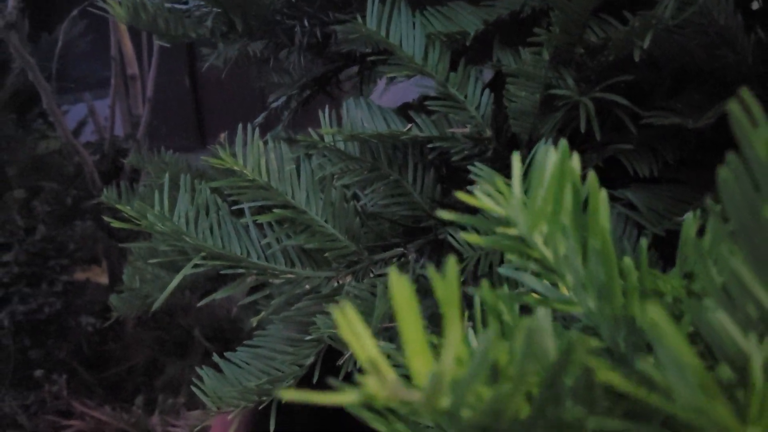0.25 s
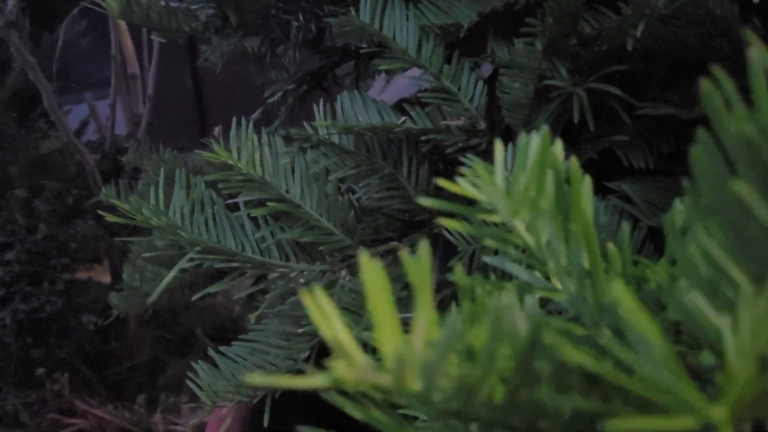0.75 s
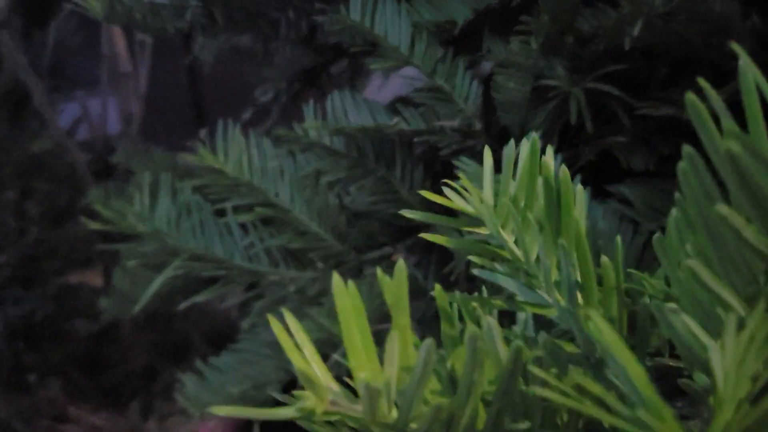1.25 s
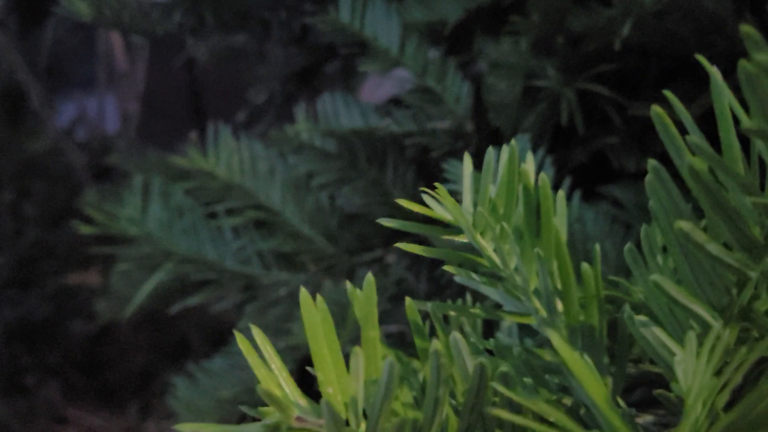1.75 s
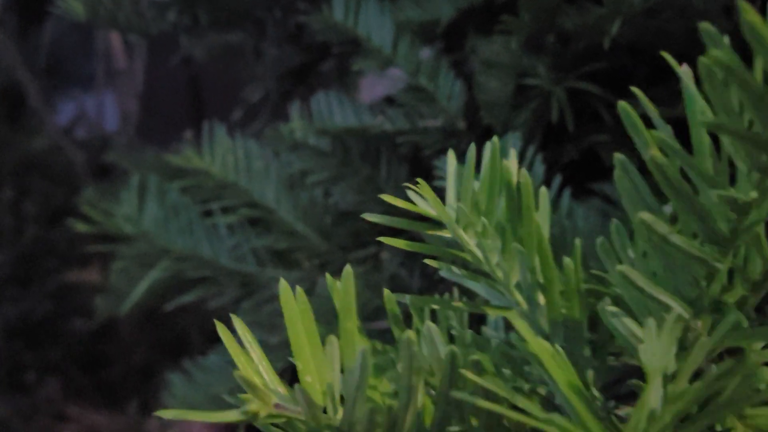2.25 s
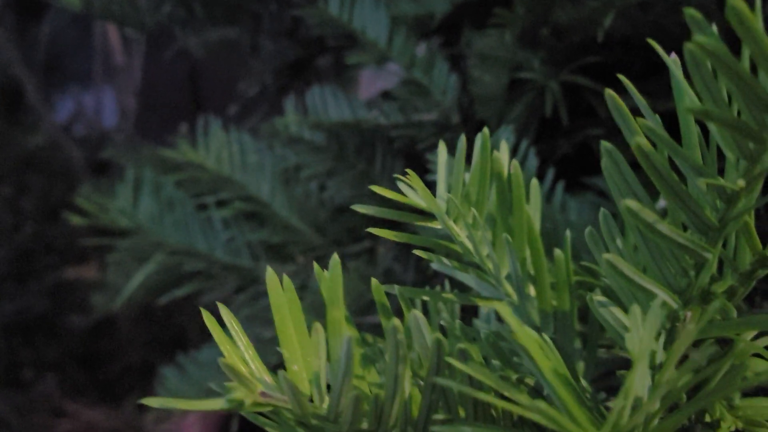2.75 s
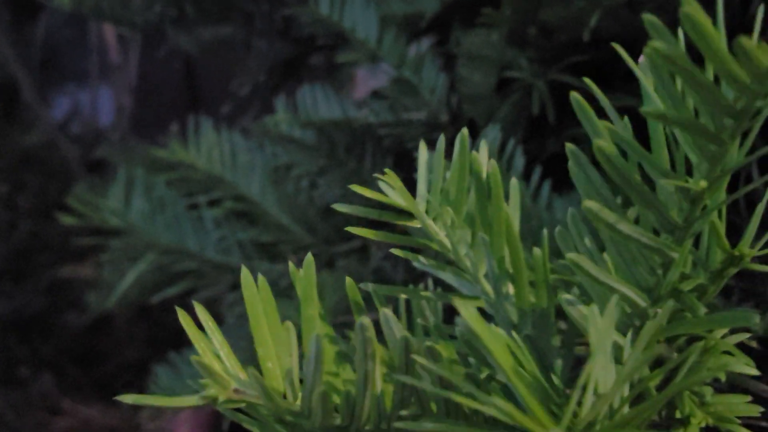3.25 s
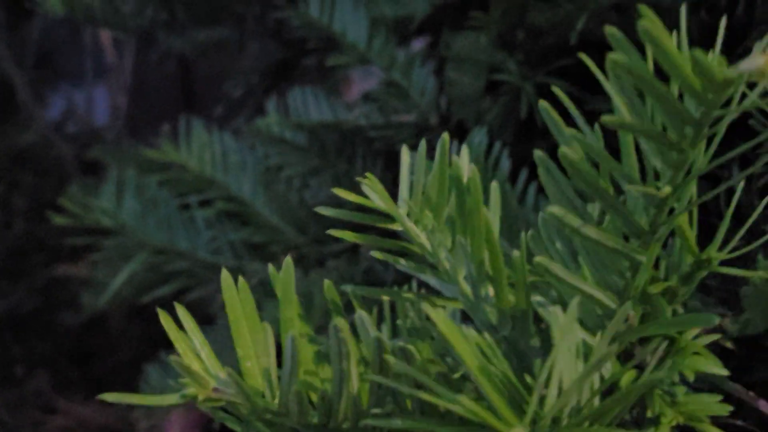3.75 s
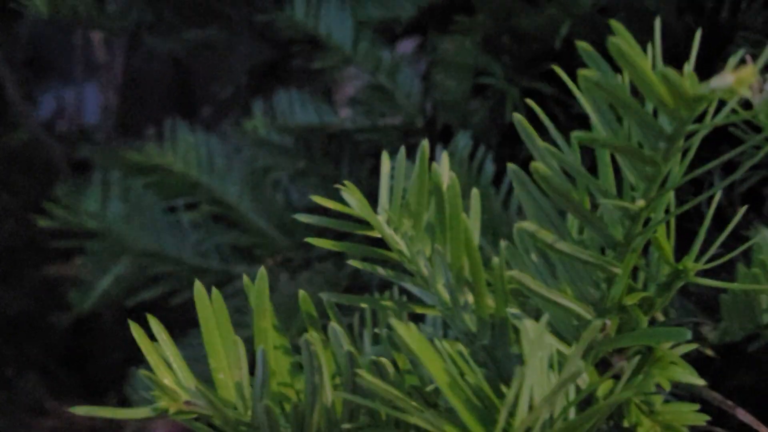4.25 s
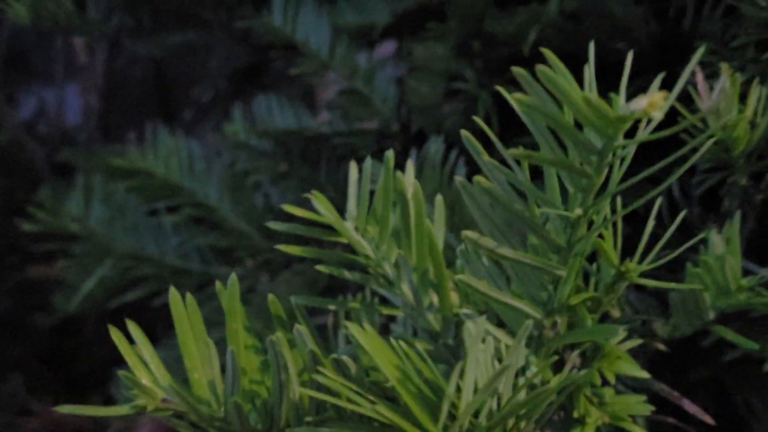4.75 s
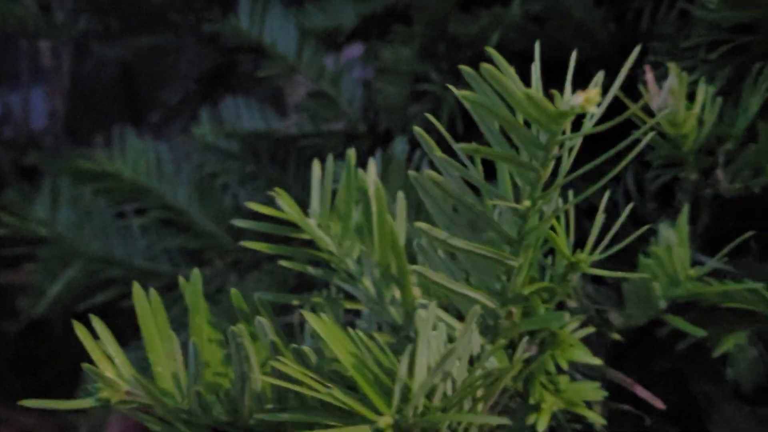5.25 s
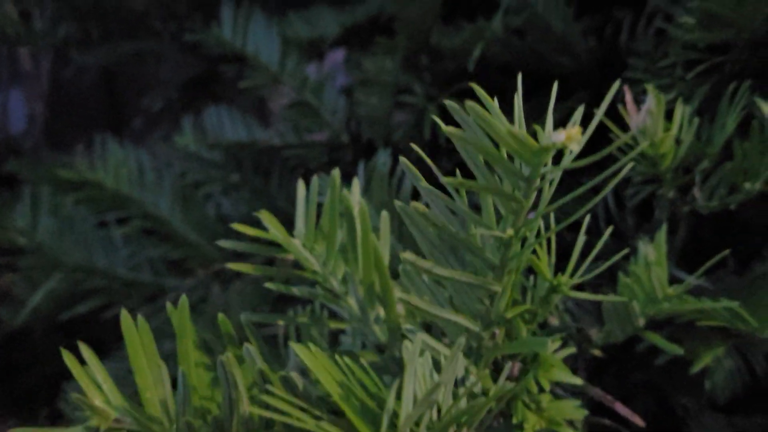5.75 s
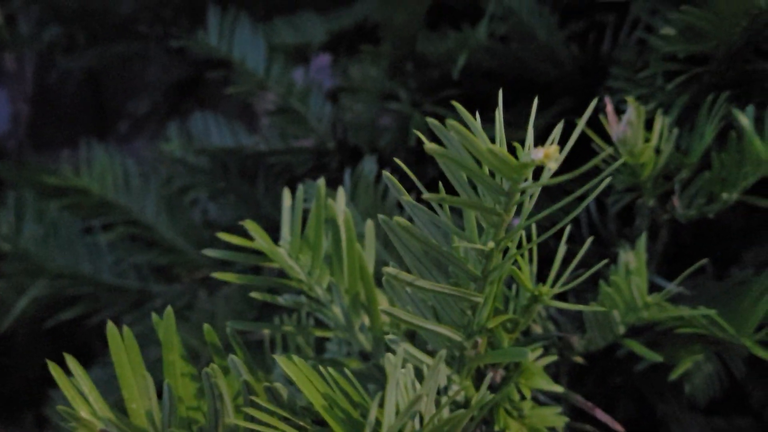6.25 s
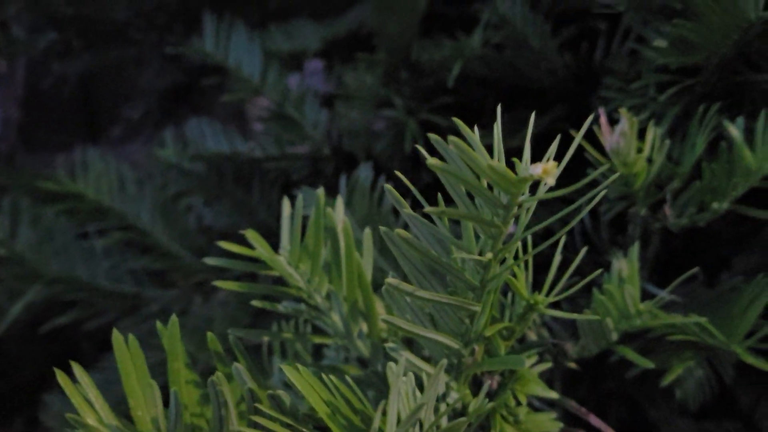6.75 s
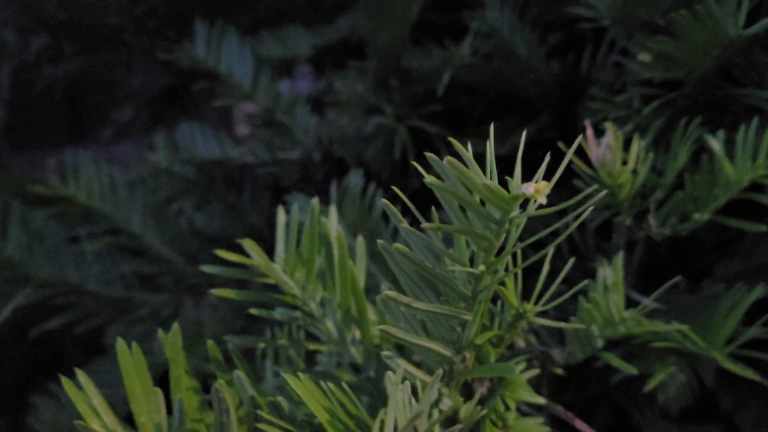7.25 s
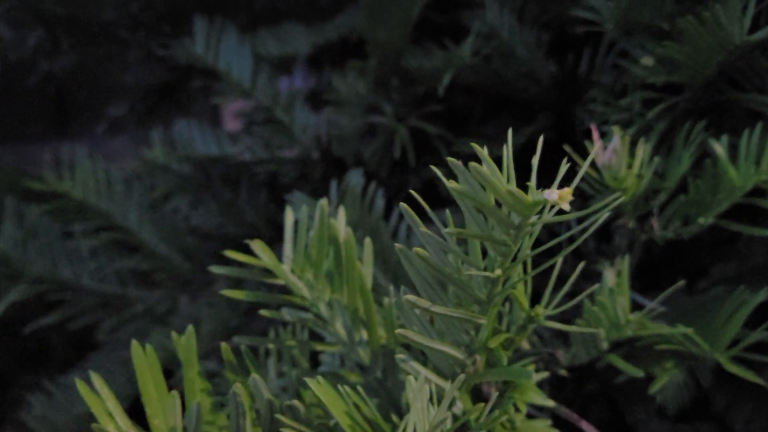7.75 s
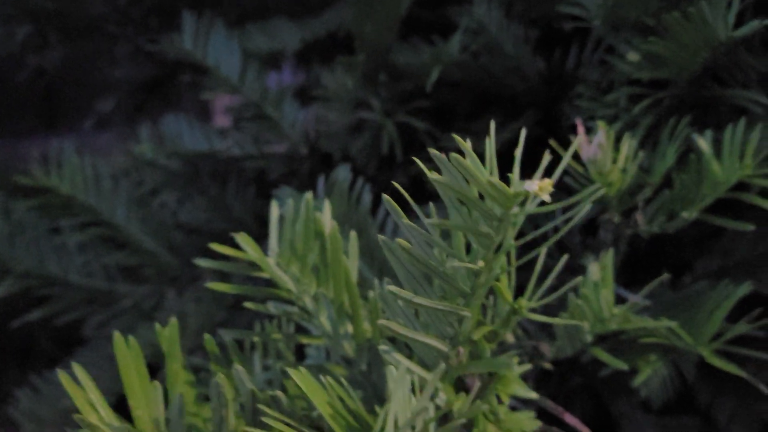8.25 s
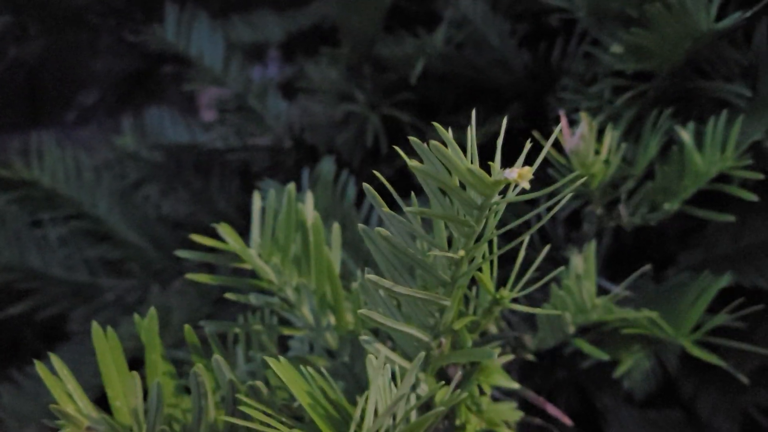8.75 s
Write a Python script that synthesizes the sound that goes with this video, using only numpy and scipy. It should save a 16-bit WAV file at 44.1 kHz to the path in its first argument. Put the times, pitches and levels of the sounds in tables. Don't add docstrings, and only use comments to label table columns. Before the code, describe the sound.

A tree frog close on the right gives short, high, rattling trills about four a second, over faint low town rumble and soft air hiss.

```python
import sys
import numpy as np
from scipy import signal
from scipy.fft import rfft, irfft
from scipy.io import wavfile
from scipy.ndimage import uniform_filter1d, minimum_filter1d

SR = 44100
rng = np.random.default_rng(int(sys.argv[2]) if len(sys.argv) > 2 else 0)


def transcribe(signal):
    frames = np.atleast_2d(signal).T
    limited = np.clip(frames, -1, 1)
    pcm = np.round(limited * 32767).astype(np.int16)
    wavfile.write(sys.argv[1], SR, pcm)


def makeup_ratio(level_db):
    decades = np.asarray(level_db, float) / 20
    return 10 ** decades


N = 396900
FREQ = np.maximum(np.arange(N // 2 + 1) * SR / N, 1)


def on_log(table, hz):
    points_hz, values = np.transpose(table)
    return np.interp(np.log(hz), np.log(points_hz), values)


def curve(table, column):
    rows = np.array(table)
    return np.interp(np.arange(N) / SR, rows[:, 0], rows[:, column])


def smooth_twice(x, size):
    return uniform_filter1d(uniform_filter1d(x, size), size)


def walk(rate_hz):
    hold = int(SR / rate_hz)
    levels = rng.standard_normal(N // hold + 1)
    return 1.3 * smooth_twice(np.repeat(levels, hold), hold)[:N]


# (frequency [Hz], correlation [-1 to 1])
LIKENESS = [(30, .72), (60, .85), (120, .82), (300, .85), (1000, .6), (4000, .3)]


def noise(gain):
    mid, side = rfft(rng.standard_normal((2, N))) * gain
    alike = np.clip(on_log(LIKENESS, FREQ), -1, 1)
    mid = mid * np.sqrt(1 + alike)
    side = side * np.sqrt(1 - alike)
    out = irfft(np.array([mid + side, mid - side]), N)
    return out / out.std()


# (time [s], half length [s], bass rise [dB], drone rise [dB])
SURGES = [
    (0, 0.79, 6.5, 0),
    (2.4, 0.26, 1, 4.5),
    (3.549, .25, 0.5, -0.5),
    (3.898, .25, 0, 4),
    (4.62, 0.17, 8.5, -2),
    (4.935, 0.23, 2, 8),
    (5.88, .3, 1, 4),
    (8.9, 0.13, 4, -0.5),
]


def surge(column):
    t = np.arange(N) / SR
    return sum(row[column] * np.exp(-((t - row[0]) / row[1]) ** 2) for row in SURGES)


# (frequency [Hz], density [dB per Hz])
RUMBLE = [(12, -30), (20, -12), (43, -4), (64, 0.5), (83, -0.5), (134, -7.5), (219, -24), (322, -13.5),
          (383, -21.5), (480, -36), (620, -68.5), (1060, -120)]
# (frequency [Hz], density [dB per Hz])
DUSK_AIR = [(360, -41), (620, -9), (714, -16.5), (802, -10.5), (1080, -13.5), (1300, -9.5), (1880, -13.5),
            (2890, -8), (3710, -14), (4530, -23), (5890, -53.5), (9970, -120)]
# (frequency [Hz], width [Hz], level [dB])
HUM = [(61.7, 17, -59), (296, 20, -77.5)]
BASS_DB, DRONE_DB, DUSK_AIR_DB, HISS_DB = -58, -66, -79 + 1.0, -89


def background():
    low = makeup_ratio(on_log(RUMBLE, FREQ))
    bass_share = 1 / (1 + (FREQ / 175) ** 8)
    bass = noise(low * bass_share) * makeup_ratio(BASS_DB - 4.5 + surge(column=2) + 1.0 * walk(4))
    drone = noise(low * (1 - bass_share)) * makeup_ratio(DRONE_DB + 1.0 + surge(column=3) + 0.75 * walk(7.8))
    hum = sum(makeup_ratio(db) * noise(1 / (1 + (2 * (FREQ - hz) / width_hz) ** 2)) for hz, width_hz, db in HUM)
    air = noise(makeup_ratio(on_log(DUSK_AIR, FREQ))) * makeup_ratio(DUSK_AIR_DB + 1.0 * walk(4))
    left, right = bass + drone + hum + air
    hiss = makeup_ratio(HISS_DB) * rng.standard_normal((2, N))
    return np.array([np.roll(left, shift=-22) * makeup_ratio(0.8), right * makeup_ratio(1.8)]) + hiss


# (delay [ms], left level [dB], right level [dB])
ECHOES = [
    (3.9, -14, -15.5),
    (7.7, -24, -24),
    (13, -27, -27),
    (22, -29, -29),
    (39, -35, -32),
]
# (frequency [Hz], quick level [dB], quick t60 [s], slow level [dB], slow t60 [s])
GARDEN = [(770, -20.5, 0.21, -49, 1), (1500, -11, 0.075, -37, 0.34), (2520, -27.5, 0.26, -41, 0.47),
          (3020, -22, 0.16, -36.5, 0.39), (3520, -37, 0.44, -47, 0.55), (5000, -10, 0.12, -35, 0.26),
          (9000, -27, 0.091, -42.5, .25)]


def garden():
    t = np.arange(SR // 2) / SR
    hz = np.maximum(np.arange(len(t) // 2 + 1) * SR / len(t), 1)
    patchy = makeup_ratio(28 * uniform_filter1d(rng.standard_normal((2, len(t))), size=64))
    onset = 1 - np.exp(-(t / .005) ** 2)
    leaves = rng.standard_normal((2, len(t))) * patchy * onset / 21
    out = np.zeros((2, len(t)))
    centres_hz = [row[0] for row in GARDEN]
    for k, (_, db, t60_s, slow_db, slow_t60_s) in enumerate(GARDEN):
        this_band = np.arange(len(centres_hz)) == k
        share = on_log(list(zip(centres_hz, this_band)), hz)
        fade = makeup_ratio(db - 60 * t / t60_s) + makeup_ratio(slow_db - 60 * t / slow_t60_s)
        out += irfft(rfft(leaves * fade) * share, len(t))
    out[:, 0] += 1
    for delay_ms, *db in ECHOES:
        out[:, int(delay_ms * SR / 1000)] += makeup_ratio(np.array(db))
    return out


# (frequency [Hz], density [dB per Hz])
RASP = [(1000, -43.5), (2200, -1), (4000, 0.5), (4800, -14.5), (5850, -12.5), (7000, -21.5), (8300, -10.5),
        (9500, -22), (10100, -38.5), (11600, -45.5), (15500, -52)]
RASP_DB = -22


def rasp(voice):
    air = irfft(rfft(rng.standard_normal(N)) * makeup_ratio(on_log(RASP, FREQ)), N)
    flow = smooth_twice(np.abs(voice), 130)
    flow = np.abs(flow) ** 1.114 * makeup_ratio(3.5)
    return makeup_ratio(RASP_DB) * flow * np.array([np.roll(air, shift=18), air]) / air.std()


GAP_MS, GAP_EXTRA_MS, GAP_SETTLE_PULSES, GAP_SHRINK_MS = 5.7, 1.35, 2.6, .055
WARMUP_1_MS, WARMUP_2_MS, WARMUP_MS_PER_DB = 10.0, 8.2, .07


def larynx_pulses(length_ms, count, warm_db, last_db, chance):
    k = np.arange(count - 1)
    gaps_ms = GAP_MS + GAP_EXTRA_MS * np.exp(-k / GAP_SETTLE_PULSES) - GAP_SHRINK_MS * k
    run_ms = np.cumsum(gaps_ms) - gaps_ms
    run_ms = run_ms * (length_ms - 5.2 - .12 * last_db) / run_ms[-1]
    warm_ms = WARMUP_2_MS + WARMUP_MS_PER_DB * (warm_db + 10)
    ms = np.r_[-WARMUP_1_MS - warm_ms, -warm_ms, run_ms, length_ms, length_ms + 4.1]
    ms[3:-2] += .015 * chance[3:count + 1, 0]
    attack_db = (-6.5 + .2 * (warm_db + 14)) * np.exp(-k / 1.7)
    tail_db = -2.5 * np.exp((k - k[-1]) / 1.5)
    db = np.r_[warm_db - 21, warm_db - 1.1, attack_db + tail_db, last_db, 2.2 * last_db - 3.5]
    fill = 1 - np.exp(-np.maximum(ms + 2.0, 0) / 36)
    return ms, db + .4 * chance[:count + 3, 1], fill


# (early pitch [Hz], late pitch [Hz], early level [dB], late level [dB], left extra [dB])
RINGS = [(800, 810, -30.5, -27.5, 3.5), (1217, 1393, -8.5, -15.5, 4.5), (1444, 1702, -20, -16.5, 4.5),
         (2100, 770, -25.5, -50, -3), (2120, 2496, -28.5, -18, -5.5), (2789, 3126, 0.5, -1, -1),
         (2794, 2960, -20.5, -13.5, 0), (3570, 3500, -22, -23, -4), (3800, 4834, -35, -26, 2),
         (4920, 4836, -46, -28.5, 2.5), (6050, 6250, -42.5, -46.5, -5), (8020, 8520, -40, -31, -2.5),
         (10700, 10550, -58, -47.5, -13.5), (12200, 18000, -67, -62, -3.5)]
STAGES = [3, 3, 3, 3, 3, 8, 3, 3, 3, 3, 3, 3, 3, 3]
TAU_MS = [1.0, .62, .5, .6, .6, .31, .9, .5, .4, .55, .6, .33, .6, .6]
PEAK_MS = [-.2, -.7, -.95, -.8, -.3, -.05, 1.5, 0, -.2, -.2, -.6, .3, .3, .3]
LEFT_MS = [0.022, 0.012, 0.00094, .016, -0.025, -0.0021, -0.031, -0.029, .001, 0.0049, -0.017, -0.035,
           -0.021, .001]
TURN = [.7, .7, .7, .7, .9, 1, 1, 1, 1, 1, 1, 1, 1, 1]
SAG_PER_MS2, BASS_SAG_RATIO = 0.0026, 6.4
WARMUP_RING = 0.89
LEFT_FILL_DB = 1


def sac_rings(late_samples, warming, db, fill, lag_ms, pan_db, luck):
    hz0, hz1, db0, db1, left_db = np.array(RINGS).T[:, :, None]
    stages, tau_ms, peak_ms, left_ms, turn = np.array([STAGES, TAU_MS, PEAK_MS, LEFT_MS, TURN])[:, :, None]
    low_ring = turn < .8
    turned_ms = lag_ms - .41
    hz = (hz0 + (hz1 - hz0) * fill) * (1 + .003 * luck[2])
    ring_db = db0 + (db1 - db0) * fill + 1.0 * luck[3:, None] * (db0 < -5)
    ring_db = ring_db + np.minimum(-.35 * db, 5) * low_ring
    ring_db = ring_db + .7 * min(db + 5.5, 0) * (hz0 > 7000)
    ring_db = ring_db - 35 * turned_ms * (hz0 > 5000)
    ring_db = ring_db + 15 * turned_ms * (hz0 < 2000)
    tau = tau_ms * (WARMUP_RING if warming else 1)
    ears_ms = (.41 + turn * turned_ms + left_ms, 0)
    turn_db = -4.4 + (pan_db + 4.4) * np.where(low_ring, -1.3, 1) + left_db
    ears_db = (turn_db + LEFT_FILL_DB * (fill - .6) * (np.abs(hz0 - 2800) < 300), 0)
    sag = SAG_PER_MS2 * np.where(low_ring, BASS_SAG_RATIO, 1)
    out = np.zeros((2, 640))
    for ear in range(2):
        after_peak_ms = (np.arange(640) - late_samples) * 1000 / SR - 4 - ears_ms[ear] - peak_ms
        t_ms = np.maximum(after_peak_ms + stages * tau, 0)
        body = np.exp(stages * np.log(t_ms / tau / stages + 1e-9) + stages - t_ms / tau)
        cycles = hz * (t_ms - sag * np.clip(after_peak_ms + .3, 0, 3) ** 3 / 3) / 1000
        rings = makeup_ratio(ring_db + ears_db[ear]) * body * np.sin(2 * np.pi * cycles)
        out[ear] = rings.sum(axis=0)
    return out


# (time [s], left ear lag [ms], left minus right at the main ring [dB])
AIM = [
    (0, .468, -5.0),
    (2.4, .459, -4.9),
    (3.7, .446, -5.0),
    (5.3, .407, -5.0),
    (7.3, .363, -3.3),
    (9, .345, -3.4),
]
# (first full pulse [s], time to last pulse [ms], warm-up pulse [dB])
FIRST_BOUT = [(.0646, 74.3, -22.7), (.2782, 78.0, -23.1), (.4927, 71.8, -22.1), (.7057, 74.0, -20.0),
              (.9763, 74.1, -14.6), (1.2317, 74.4, -12.6), (1.4505, 74.9, -14.5), (1.7014, 78.2, -9.5),
              (1.922, 75.6, -12.7), (2.1598, 78.0, -12.1), (2.4035, 77.7, -9.1), (2.6122, 72.6, -6.5),
              (2.8195, 79.0, -18.3), (3.03, 77.7, -18.1), (3.2593, 75.5, -9.3), (3.4958, 77.0, -13.1),
              (3.7071, 74.6, -17.0), (3.916, 78.5, -18.1), (4.19, 78.0, -10.9), (4.4613, 79.1, -10.2)]
# (first full pulse [s], time to last pulse [ms], warm-up pulse [dB])
SECOND_BOUT = [(4.8468, 77.3, -6.5), (5.0577, 74.4, -5.5), (5.2628, 73.9, -17.9), (5.4736, 75.3, -16.4),
               (5.6848, 74.8, -18.2), (5.9089, 74.9, -11.7), (6.1479, 74.7, -11.2), (6.3888, 74.3, -11.3),
               (6.5956, 74.8, -17.6), (6.8082, 74.5, -19.2), (7.0341, 74.8, -12.6), (7.2449, 74.2, -16.8),
               (7.4885, 78.5, -12.1), (7.7022, 75.4, -16.4), (7.9569, 79.2, -11.4), (8.1635, 75.6, -19.7),
               (8.4328, 79.4, -11.4)]
USUAL_PULSES, USUAL_MS, MS_PER_EXTRA_PULSE = 14, 74.3, 4.2
EASY_PACE_MS, LAST_DB, HURRY_DB_PER_MS = 5.39, -3.5, 24
FROG_DB, PEAK_DB, TIRES_S, TIRE_DB_PER_S = 3.63, 0.34, 6.7, 0.48


def frog():
    out = np.zeros((2, N + 1024))
    lag_ms, pan_db = curve(AIM, column=1), curve(AIM, column=2)
    notes = FIRST_BOUT + SECOND_BOUT
    chance = rng.standard_normal((len(notes), 20, 3 + len(RINGS)))
    for (s, length_ms, warm_db), luck in zip(notes, chance):
        count = round(USUAL_PULSES + (length_ms - USUAL_MS) / MS_PER_EXTRA_PULSE)
        last_db = LAST_DB - HURRY_DB_PER_MS * max(EASY_PACE_MS - length_ms / count, 0)
        peak_db = PEAK_DB - TIRE_DB_PER_S * max(s - TIRES_S, 0)
        at = int(s * SR)
        note_db = FROG_DB + 12.5 * (lag_ms[at] - 0.8333) + peak_db
        pulses = larynx_pulses(length_ms, count, warm_db, last_db, luck)
        for ms, db, fill, pulse_luck in zip(*pulses, luck):
            start = s * SR + (ms - 4) * SR / 1000
            i = int(start)
            rings = sac_rings(start - i, ms < 0, db, fill, lag_ms[at], pan_db[at], pulse_luck)
            out[:, i:i + 640] += makeup_ratio(note_db + db) * rings
    bass_cut = (makeup_ratio(-18.0) + 1 / (1 + (1070 / FREQ) ** 14)) / (1 + (660 / FREQ) ** 14)
    voice = irfft(rfft(out[:, :N]) * bass_cut, N)
    return voice + rasp(voice)


def scene():
    return signal.fftconvolve(frog(), garden(), axes=1)[:, :N] + background()


def low_pass(x):
    return signal.sosfilt(signal.butter(12, 15900, fs=SR, output="sos"), x)


def record(dry):
    room = np.minimum(1, .97 / (np.abs(dry).max(axis=0) + 1e-9))
    room = minimum_filter1d(room, size=121)
    held = dry * smooth_twice(room, 61)
    return low_pass(held)


dry = scene()
out = record(dry)
transcribe(out)
```